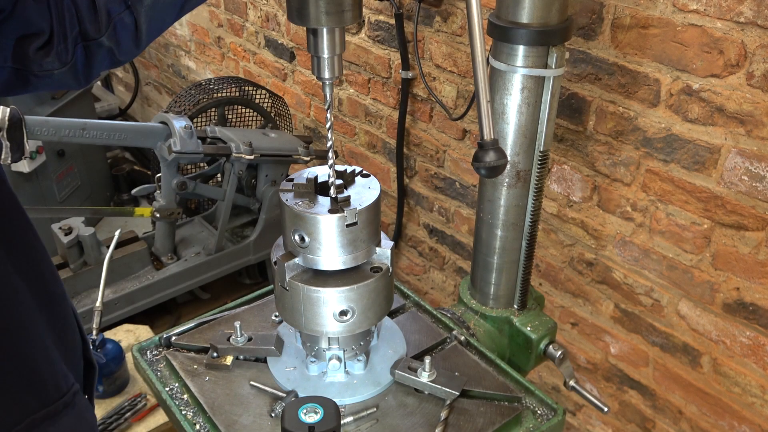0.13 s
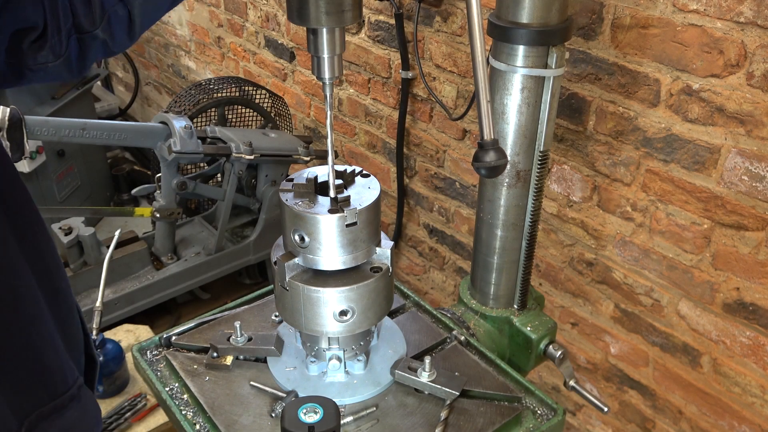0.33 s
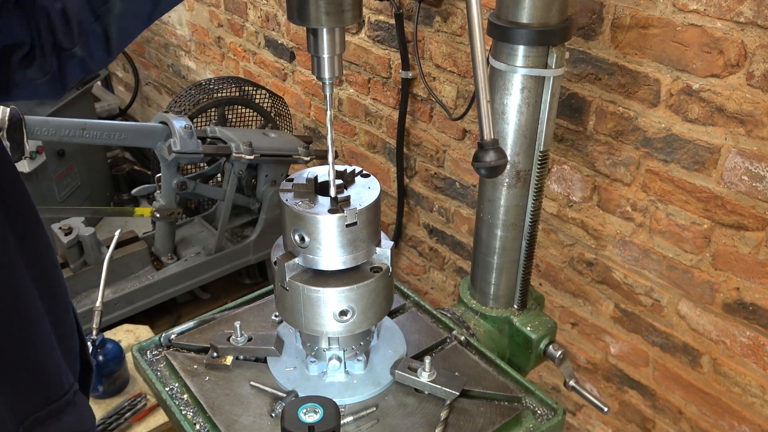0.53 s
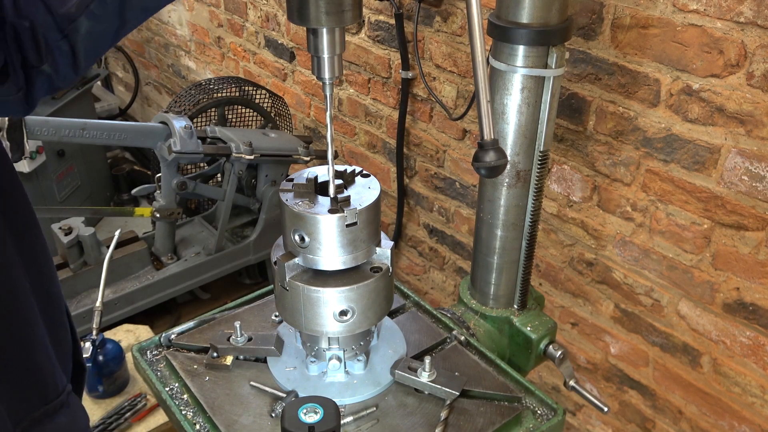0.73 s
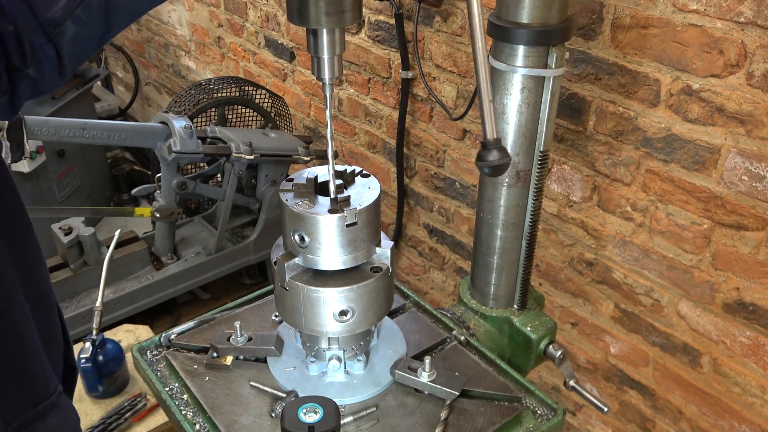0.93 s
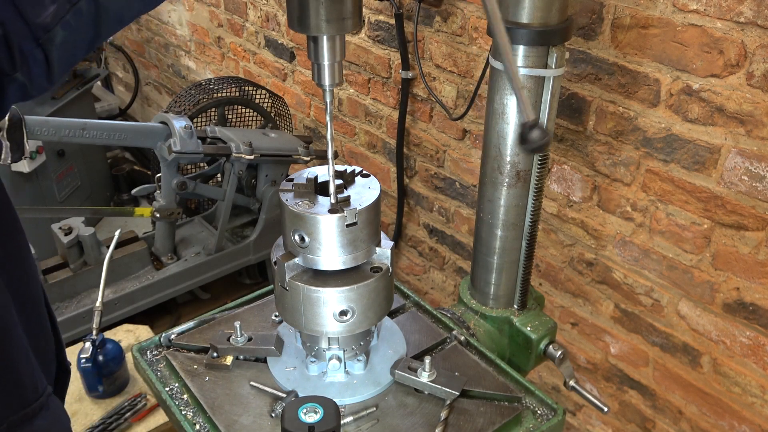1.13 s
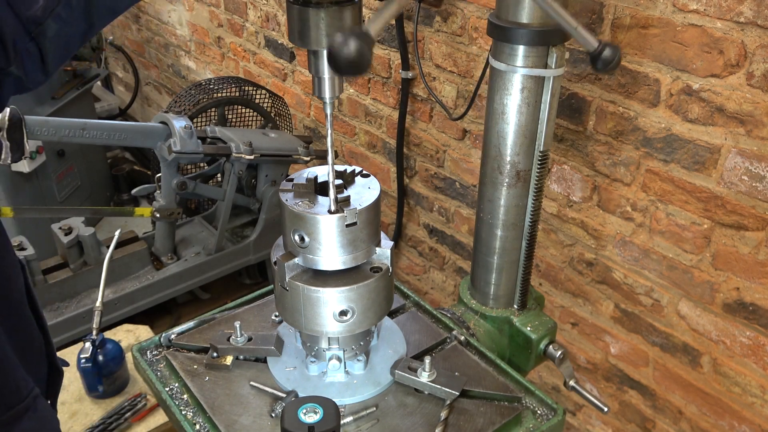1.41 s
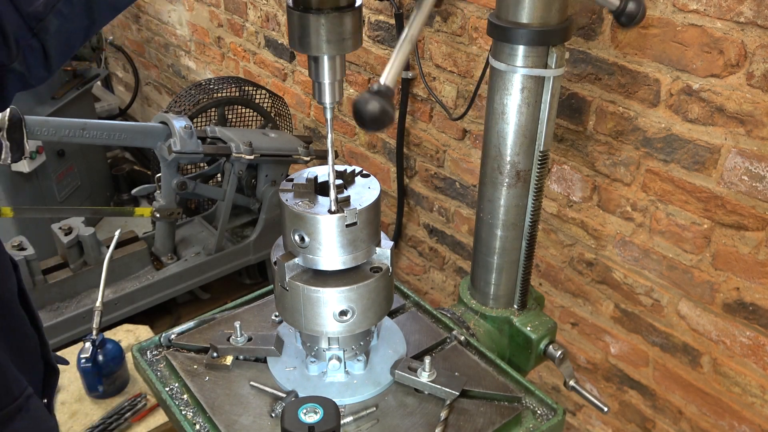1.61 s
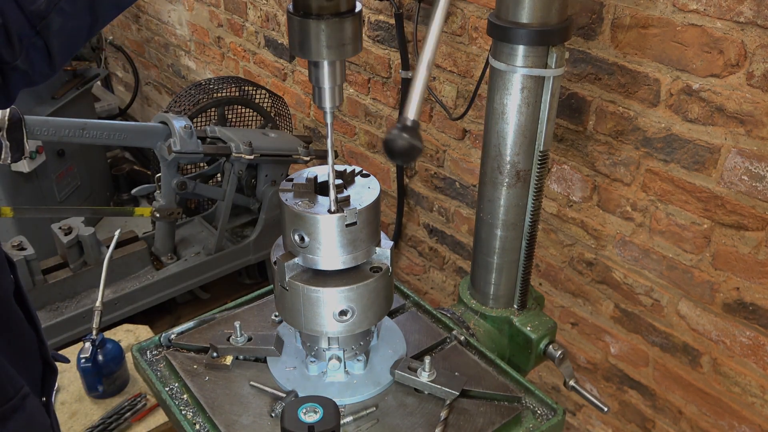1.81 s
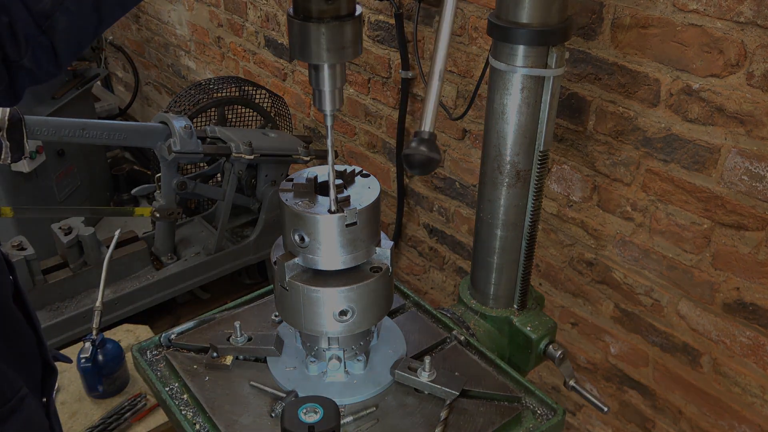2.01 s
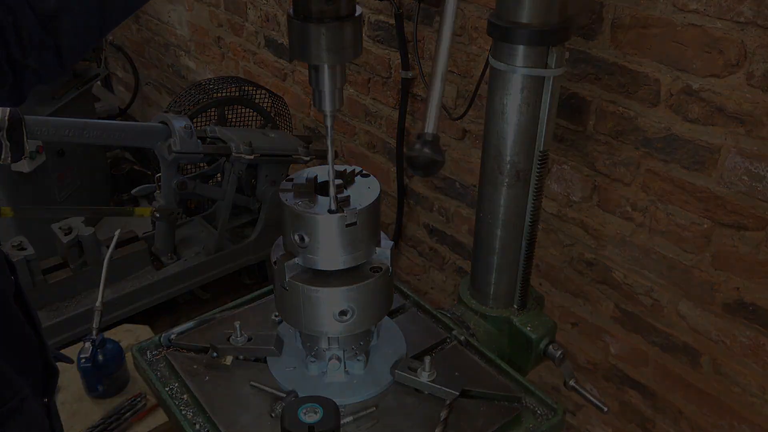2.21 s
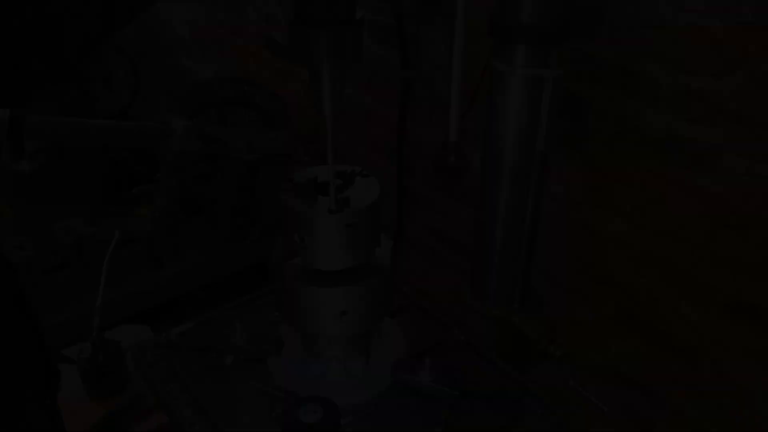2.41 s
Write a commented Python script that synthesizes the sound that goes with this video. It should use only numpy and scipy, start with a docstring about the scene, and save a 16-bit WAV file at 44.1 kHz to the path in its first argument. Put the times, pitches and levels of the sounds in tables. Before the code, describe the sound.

A pillar drill in a small brick workshop. Quiet air and tiny clicks, then a loud switch snap at 0.2 s; belt scuff, knocks and a thump at 0.4 as it spins up quickly. A rough low drone with metallic rattle and soft hiss continues, with faint chip crackle from 0.6 to 1.6 and knocks near 1.05, 1.2 and 1.5. The quill thumps back at 1.8, faint fast chirps follow, fading out by 2.45.

```python
"""A small brick workshop with a pillar drill: the switch snaps, then belt and pulleys clatter up to speed.
The motor drones on waves near multiples of its shaft rate; random tiny taps make the rattle and hiss of the
loose drive. Noise bursts and dying tones make the clicks, knocks and thumps, and chips crackle off the bit in
a metal part. The quill comes back up with a thump, the spindle chirps once a turn, and the sound fades out."""
import sys
import numpy as np
from scipy import signal
from scipy.fft import rfft, irfft
from scipy.io import wavfile
from scipy.ndimage import uniform_filter1d

SR = 44100
rng = np.random.default_rng(int(sys.argv[2]) if len(sys.argv) > 2 else 0)


def persist_wave(psi):
    """Save psi, clipped to +-1, as 16-bit WAV."""
    counts = np.round(np.clip(psi, -1, 1) * 32767).astype(np.int16)
    wavfile.write(sys.argv[1], SR, np.atleast_2d(counts).T)


N = 112454  # length in samples

START_S = .215  # the motor starts to turn


def undb(db):
    """Turn decibels into gain."""
    return 10 ** (np.asarray(db) / 20)


def unit(x):
    """Scale to an average (rms) level of 1."""
    return x / np.sqrt(np.mean(x ** 2))


def walk(rate):
    """Slow random drift: levels held for 1 / rate seconds, then smoothed twice."""
    hold = max(int(SR / rate), 2)
    held = np.repeat(rng.standard_normal(N // hold + 2), hold)
    held = held[rng.integers(hold):][:N]
    return unit(uniform_filter1d(uniform_filter1d(held, hold), hold))


def bell(t, centre, width):
    """A smooth swell around a moment; width is its standard deviation in seconds."""
    return np.exp(-((t - centre) / width) ** 2 / 2)


def colour(x, points):
    """Filter through (Hz, dB) points without sounding early; white noise keeps its level."""
    hz, db = np.array(points, float).T
    f = np.maximum(np.fft.rfftfreq(4096, 1 / SR), 1)
    curve_db = np.interp(np.log(f), np.log(hz), db)
    # beyond the end points the curve falls by 12 dB an octave
    curve_db = curve_db - 12 * np.maximum(np.log2(f / hz[-1]), 0)
    curve_db = curve_db - 12 * np.maximum(np.log2(hz[0] / f), 0)
    # fold the cepstrum forward in time, so that the filter responds at once (minimum phase)
    cepstrum = irfft(np.log(undb(curve_db)))
    cepstrum[1:2048] *= 2
    cepstrum[2049:] = 0
    response = irfft(np.exp(rfft(cepstrum)))
    return signal.fftconvolve(x, response / np.linalg.norm(response))[:N]


def ring(modes, start=0):
    """Struck metal: dying tones (Hz, seconds to fall 60 dB, dB), together about rms 1 at first."""
    age = np.maximum(np.arange(N) / SR - start, 0)
    tones = 0
    for hz, t60, db in modes:
        tones = tones + undb(db) * np.sin(2 * np.pi * hz * age) * np.exp(-np.log(1000) * age / t60)
    return tones / np.sqrt(sum(undb(db) ** 2 for _, _, db in modes) / 2)


def burst(t, start, decay):
    """A dying spray of tiny contacts, made of noise."""
    return (t >= start) * np.exp(-np.maximum(t - start, 0) / decay) * rng.standard_normal(N)


def contacts(per_s, spread_db):
    """Random small impacts of uneven size."""
    hit = rng.random(N) < per_s / SR
    sign = rng.choice([-1, 1], N)
    size = undb(spread_db * np.clip(rng.standard_normal(N), -2, 2))
    return unit(hit * sign * size)


def workshop(x, t):
    """Short reflections from near brick walls: a tail of dying noise."""
    room_t60_s, room_db = 0.26, -8
    tail = burst(t, .004, room_t60_s / np.log(1000))
    return x + undb(room_db) * signal.fftconvolve(x, tail / np.linalg.norm(tail))[:N]


def room_air():
    """Quiet air of the room: steady noise, mostly low."""
    # colour of the air [f/Hz, level/dB]
    air_colour = [(20, -14.5), (45, 11.5), (80, 8), (150, 0.5), (400, -4), (1500, -13), (5000, -21.5),
                  (10000, -24), (15500, -29.5)]
    air_db = -56
    return undb(air_db) * colour(rng.standard_normal(N), air_colour)


def start_up(t):
    """A faint low rumble comes first; then the belt scuffs and the frame shudders as the motor gathers speed."""
    # colour of the low rumble around the start [f/Hz, level/dB]
    stir_colour = [(30, -11), (50, -4), (85, -4.5), (115, -12.5)]
    # colour of the scuffing belt [f/Hz, level/dB]
    scuff_colour = [(500, -1.5), (1200, 3), (2100, 15.5), (2600, 0.5), (4500, 0), (6600, 2.5),
                    (8800, -14.5), (9600, -12.5), (11000, -7), (12600, -4), (13600, -16), (15500, -20.5)]
    stir_s, stir_width_s, stir_db = 0.19, 0.054, -53
    slip_s, slip_width_s, scuff_db = 0.327, 0.036, -44
    shudder_hz, shudder_db = 92.3, -36.5
    swell = bell(t, slip_s, slip_width_s) * np.clip((t - START_S) / .02, 0, 1)
    scuff = undb(scuff_db) * colour(contacts(5000, 3.1), scuff_colour)
    rumble = colour(rng.standard_normal(N), stir_colour)
    hum = np.sin(2 * np.pi * shudder_hz * t + 1.1 * walk(30))
    shudder = undb(shudder_db) * (hum + 0.58 * rumble)
    stir = undb(stir_db) * bell(t, stir_s, stir_width_s) * rumble
    return swell * (scuff + shudder) + stir


def click(t, start, decay, ring_db, hz):
    """A crack with its own bright band, and the ring of small steel parts."""
    # colour of every crack [f/Hz, level/dB]
    crack_colour = [(250, -4.5), (500, 9.5), (1200, 4.5), (3000, -1.5), (5000, 3), (7500, 0.5), (9500, -2),
                    (10800, -12), (15500, -10)]
    # ringing of the small steel parts [f/Hz, time to fall 60 dB/s, relative level/dB]
    steel_modes = [(2354, .1, -6.5), (4315, 0.076, 5), (5420, 0.071, -7.5), (7750, .05, -7.5),
                   (8960, .035, 1), (9455, .05, -6.5)]
    rise_s, band_db = 0.00069, -7
    crack = burst(t, start, decay) * np.clip((t - start) / rise_s, 0, 1)
    band = colour(crack, [(hz / 2, -20), (hz * .75, -2), (hz * 1.2, 0), (hz * 1.5, -16)])
    steel = undb(ring_db - 8.5) * ring(steel_modes, start)
    return colour(crack, crack_colour) + undb(band_db) * band + steel


def clicks(t):
    """Sharp clicks of the switch and loose steel."""
    # each click [t/s, level/dB, decay/s, ring level before a cut of 8.5 dB/dB, middle of bright band/Hz]
    click_list = [(.082, -55, 0.0017, -10, 5430), (.109, -51.5, 0.0021, -13, 3480),
                  (.172, -57, 0.0039, -2, 4200), (0.1927, -45, .002, -8.5, 9500),
                  (0.2026, -23.5, 0.0031, -8, 7700), (0.2887, -31.5, 0.0065, -24.5, 7350),
                  (0.365, -27.5, .002, -22, 4800), (1.799, -48, .002, -15.5, 7400),
                  (1.849, -38, 0.0019, -20, 8550)]
    return sum(undb(db) * click(t, s, decay, ring_db, hz) for s, db, decay, ring_db, hz in click_list)


def motor_drone(angle):
    """Waves near multiples of the shaft rate, each wavering in strength and phase, higher ones more."""
    # parts of the drone [multiple of the shaft rate, relative level/dB]
    drone_parts = [(4, -18.5), (6, -21), (7, -4), (8, -13.5), (9, -4), (10, 2.5), (10.9, -8), (12, -1),
                   (13, -7), (14, -10.5), (15, -14.5), (16, -12), (17, -15.5), (18, -26.5), (20, -11),
                   (21, -14.5), (22, -15.5), (23, -28), (24, -31), (38, -26), (44, -35.5), (50, -29)]
    roughness = 0.43  # for the 10th multiple
    drone = 0
    for k, db in drone_parts:
        waver = 1 + roughness * k / 10 * (walk(14.04) + 1j * walk(16)) / 2
        wave = np.exp(1j * (k * angle + 2 * np.pi * rng.random()))
        drone = drone + undb(db) * np.real(waver * wave)
    return unit(drone)


def frame_rumble():
    """Many small random impacts heard as a low rumble of the frame."""
    # colour of the frame rumble [f/Hz, level/dB]
    rumble_colour = [(40, -42), (80, -33.5), (140, -15), (190, -7), (260, -5), (340, 0.5), (400, -5.5),
                     (450, -15), (535, -6.5), (620, -16.5), (900, -49.5)]
    return colour(contacts(2000, 0.79), rumble_colour)


def drive_rattle(t, angle):
    """Loose parts tap, slightly harder once a shaft turn and with the belt, and set the casting ringing."""
    # colour of the taps [f/Hz, level/dB]
    rattle_colour = [(300, -4), (600, -2), (780, 2.5), (950, 6.5), (1150, 0), (1270, 0.5), (1420, -9),
                     (1900, -14), (2500, -36), (4000, -25.5)]
    # ringing of the casting [f/Hz, time to fall 60 dB/s, relative level/dB]
    casting_modes = [(790, .2, 5), (953, 0.15, -3), (1081.4, 0.13, -2), (1149, 0.23, -0.5),
                     (1244, .12, 3.5), (1580, 0.2, -18.5), (1660, 0.12, -18.5), (1847, 0.18, -7.5),
                     (2020, 0.27, -16.5)]
    taps_per_s, spread_db, turn_depth, casting_db = 1500, 1.5, 0.079, -10
    belt_hz, belt_db = 12.8, 0.7
    throb = undb(belt_db * np.sin(2 * np.pi * belt_hz * t) + .5 * walk(20))
    turn_swell = 1 + turn_depth * np.cos(angle)
    taps = unit(contacts(taps_per_s, spread_db) * turn_swell * throb)
    casting = unit(signal.fftconvolve(taps, ring(casting_modes))[:N])
    return workshop(colour(taps, rattle_colour), t) + undb(casting_db) * casting


def bearing_hiss(angle, rattle_gain):
    """Dense fine impacts in the bearings that swell once a shaft turn and partly follow the rattle's level."""
    # colour of the hiss [f/Hz, level/dB]
    hiss_colour = [(1200, 4), (2600, 5.5), (3500, 5.5), (4300, 0), (4900, -6), (5550, 0), (7000, -7),
                   (8600, -14.5), (11000, -22.5), (15500, -18)]
    hiss_db, spread_db, turn_depth, follow = -57, 2, 0.14, 0.51
    turn_swell = 1 + turn_depth * np.cos(angle)
    grit = unit(contacts(9000, spread_db) * turn_swell * undb(0.54 * walk(18)))
    return undb(hiss_db) * unit(rattle_gain ** follow) * colour(grit, hiss_colour)


def machine(t):
    """The shaft gathers speed and drives the drone, rumble, rattle and hiss; low and clattering parts apart."""
    # levels of the running machine [t/s, drone level/dB, frame rumble level/dB, rattle level/dB]
    run_levels = [(.22, -45, -35, -34), (.27, -37, -23, -32.5), (.35, -26.5, -29, -36),
                  (.40, -21.5, -23.5, -32.5), (.56, -27.5, -26, -34), (.68, -22, -29, -35),
                  (.85, -22.5, -25.5, -36), (.92, -24.5, -29, -33), (1.05, -24, -26.5, -34),
                  (1.22, -23, -30, -34), (1.64, -26.5, -28, -34), (1.75, -28, -27.5, -36.5),
                  (1.85, -28.5, -31, -35), (2.05, -29.5, -29.5, -39.5), (2.45, -25, -31, -38)]
    shaft_hz, spin_up_s, speed_wander = 25.03, .06, 0.0017
    speed = np.tanh(np.maximum(t - START_S, 0) / spin_up_s) * (1 + speed_wander * walk(6.26))
    angle = 2 * np.pi * np.cumsum(shaft_hz * speed) / SR
    when, *levels = np.array(run_levels).T
    on = np.clip((t - START_S) / 0.0035, 0, 1)
    drone_gain, rumble_gain, rattle_gain = (on * undb(np.interp(t, when, db)) for db in levels)
    low = drone_gain * motor_drone(angle) + rumble_gain * frame_rumble()
    clatter = rattle_gain * drive_rattle(t, angle) + bearing_hiss(angle, rattle_gain)
    return low, clatter


def knocks(t):
    """The drive knocks against its play: a short noise blow that also sets the quill ringing."""
    # each knock [t/s, level/dB, decay/s, level of the bright ring against the blow/dB]
    knock_list = [(.2255, -24, .015, -18), (0.279, -29.5, 0.013, -15), (0.4163, -23, 0.0084, -23),
                  (.497, -32, 0.015, -34), (.893, -42.5, 0.022, -24), (1.054, -27, 0.045, -30),
                  (1.227, -25, 0.0085, -28), (1.469, -28.5, .01, -25), (1.796, -30, .02, -2)]
    # colour of a knock [f/Hz, level/dB]
    knock_colour = [(300, -15.5), (600, -5.5), (950, 4), (1300, 3), (1500, -11.5), (2000, -21),
                    (2800, -30.5), (5000, -45.5)]
    # ringing of the quill [f/Hz, time to fall 60 dB/s, relative level/dB]
    quill_modes = [(1610, 0.043, 2), (1736, .05, -5.5), (1904, 0.031, -8), (2540, 0.022, -17)]
    quill = ring(quill_modes)
    quill = quill / np.linalg.norm(quill)
    out = 0
    for s, db, decay, ring_db in knock_list:
        blow = undb(db) * burst(t, s, decay)
        out = out + colour(blow, knock_colour) + undb(ring_db) * signal.fftconvolve(blow, quill)[:N]
    return out


def squeals(t):
    """Steel catches on steel and sings for a moment."""
    # each squeal [t/s, width of the swell/s, f/Hz, level/dB]
    squeal_list = [(0.273, 0.0025, 7600, -47.5), (.346, .011, 8230, -52), (.434, 0.008, 8330, -60),
                   (1.792, .003, 10560, -51.5), (1.804, .003, 10700, -56)]
    waver = 1.0 * walk(300)  # radians
    out = 0
    for s, width, hz, db in squeal_list:
        out = out + undb(db) * bell(t, s, width) * np.sin(2 * np.pi * hz * t + waver)
    return out


def thumps():
    """Dull thumps: low dying tones of the frame, kept to a low band."""
    # each thump [t/s, level before the band filter/dB]
    thump_list = [(.381, -17), (1.777, -21)]
    # ringing of the frame [f/Hz, time to fall 60 dB/s, relative level/dB]
    frame_modes = [(260.3, .13, 10), (378, .08, 2)]
    struck = sum(undb(db) * ring(frame_modes, s) for s, db in thump_list)
    low_band = signal.butter(4, [158, 700], "band", fs=SR, output="sos")  # Hz
    return signal.sosfilt(low_band, struck)


def chips(t):
    """Small chips crackle off the bit while it cuts; now and then it catches and tears a larger one."""
    # colour of a small chip breaking [f/Hz, level/dB]
    chip_colour = [(3000, -22), (4200, -8), (4900, -4), (5600, 4), (6500, -7.5), (8000, -22.5)]
    # the bit catches and tears a chip [t/s, level/dB, decay/s]
    tear_list = [(.895, -52.5, 0.016), (1.056, -39, .012), (1.176, -49, 0.01), (1.216, -53, 0.009),
                 (1.59, -56, 0.0074)]
    # colour of a tear [f/Hz, level/dB]
    tear_colour = [(1800, -21), (3200, 6.5), (4300, 4.5), (4900, -4.5), (5500, 4), (7200, -9), (8700, -2),
                   (10500, -17.5), (14000, -23.5)]
    chips_per_s, chips_db, cut_from_s, cut_to_s = 28, -60, .6, 1.65
    cutting = np.clip(np.minimum(t - cut_from_s, cut_to_s - t) / .1, 0, 1)
    cracks = unit(signal.fftconvolve(contacts(chips_per_s, 2), burst(t, 0, 0.0053))[:N])
    tears = 0
    for s, db, decay in tear_list:
        tears = tears + undb(db) * burst(t, s, decay) * np.clip((t - s) / 0.0019, 0, 1)
    rough_tears = tears * undb(4.1 * walk(704))
    return undb(chips_db) * cutting * colour(cracks, chip_colour) + colour(rough_tears, tear_colour)


def chirps(t):
    """Once the quill is up, the spindle rubs with a thin chirp on every turn."""
    # colour of a chirp [f/Hz, level/dB]
    chirp_colour = [(9000, -24), (10100, -7), (10600, -12.5), (11100, -9), (12200, -33)]
    from_s, every_s, width_s, chirp_db = 1.825, 0.0773, 0.0063, -58.5
    turn = np.maximum(np.round((t - from_s) / every_s), 0)  # number of the nearest chirp
    gate = bell(t, from_s + turn * every_s, width_s)
    return undb(chirp_db + 2 * walk(15)) * gate * colour(contacts(900, 3), chirp_colour)


def scene():
    """The drill in its room over quiet air, nearly alike in both ears; drone and rumble a shade louder in the
    right ear."""
    t = np.arange(N) / SR
    low, clatter = machine(t)
    events = clicks(t) + knocks(t) + thumps() + squeals(t) + chips(t) + chirps(t)
    centre = clatter + workshop(events, t) + start_up(t) + room_air()
    left_over_right_db = -.26
    return centre + low * undb(np.array([[left_over_right_db], [-left_over_right_db]]) / 2)


def record(dry):
    """Faint microphone hiss, a straight fade to silence and a steep cut of the top."""
    mic_hiss_db, top_hz = -90.5, 15700
    fade_from_s, fade_to_s = 1.932, 2.465
    fade = np.clip((fade_to_s - np.arange(N) / SR) / (fade_to_s - fade_from_s), 0, 1)
    heard = (dry + undb(mic_hiss_db) * rng.standard_normal(dry.shape)) * fade
    return signal.sosfilt(signal.ellip(10, .2, 80, top_hz, fs=SR, output="sos"), heard)


dry = scene()
out = record(dry)
persist_wave(out)
```